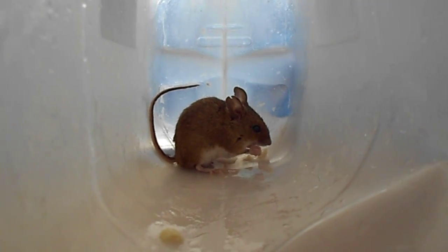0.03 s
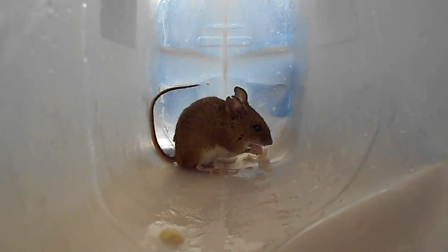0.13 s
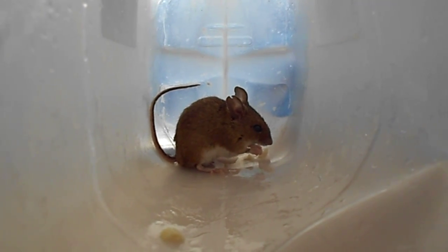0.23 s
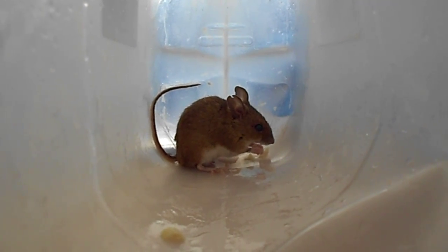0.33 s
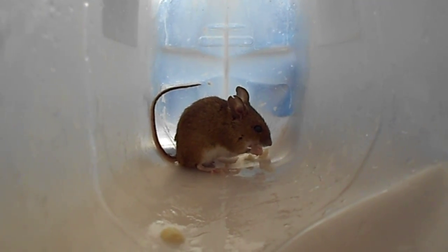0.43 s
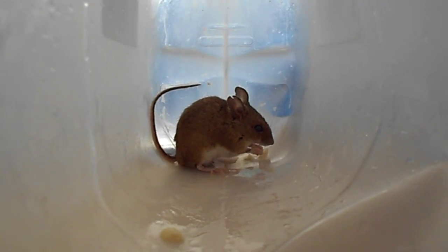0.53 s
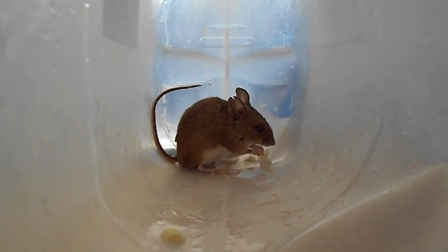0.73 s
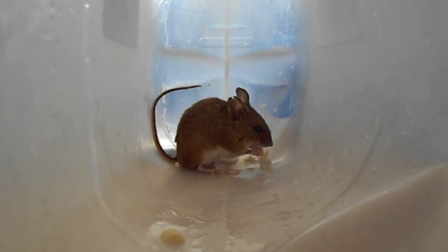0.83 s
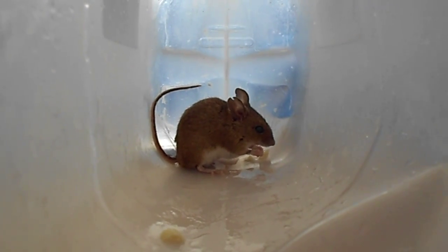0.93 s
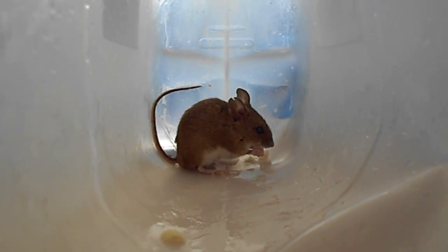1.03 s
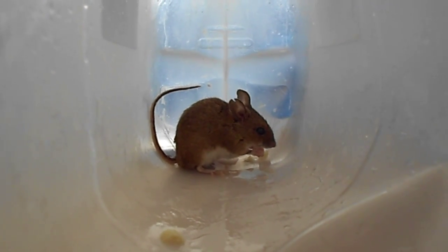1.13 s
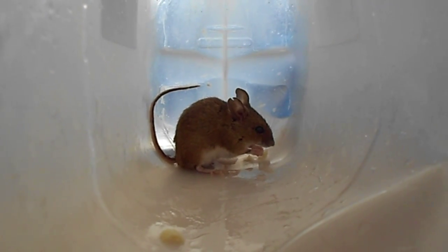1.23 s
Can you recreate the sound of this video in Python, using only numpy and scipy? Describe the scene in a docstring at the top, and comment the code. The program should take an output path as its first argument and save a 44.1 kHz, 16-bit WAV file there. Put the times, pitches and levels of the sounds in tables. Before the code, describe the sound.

One sharp click rings briefly in a thin plastic container where a mouse is feeding. A soft rustle follows, then three short, hissy scuffs. The microphone is close, in a quiet room with faint hiss.

```python
"""Mouse feeding in a plastic container.

Quiet room, close microphone. One sharp snap rings the thin plastic wall and dies away in the container.
Then friction: a broad soft rustle and three short, hissy scuffs.
Under it lie low room noise, faint stirring and the recorder's hiss with a thin whine."""
import sys
import numpy as np
from scipy import signal
from scipy.fft import rfft, irfft
from scipy.io import wavfile

SR = 44100
rng = np.random.default_rng(int(sys.argv[2]) if len(sys.argv) > 2 else 0)


def dump_mix(stems):
    """Bounce the given channels to the path in sys.argv[1] as a 16-bit WAV at rate SR."""
    frames = np.atleast_2d(stems).T  # one column per channel
    limited = np.clip(frames, -1, 1)  # hard clip at full scale
    pcm = np.round(limited * 32767).astype(np.int16)
    wavfile.write(sys.argv[1], SR, pcm)


N = 57330
T = np.arange(N) / SR
HZ = np.fft.rfftfreq(N, 1 / SR)

# Room noise and electronic hiss spectra. Each row: frequency in Hz, relative level in dB.
ROOM_SPECTRUM = [(20, 0), (45, 0), (80, -1), (130, -1.5), (285, -3), (545, -10), (900, -11), (1500, -15)]
HISS_SPECTRUM = [(300, -13), (1200, 0.5), (2500, 1.5), (4000, 0), (7000, -1), (10200, -2.5), (11000, -16.5),
                 (12100, -23), (12600, -48)]
# Whine tones. Each row: frequency in Hz, rms level in dB.
WHINE_TONES = [(5997, -75), (6998, -70.5), (8000, -72.5)]

# Dull movements. Each row: start, rise, hold and fall in seconds, level in dB.
STIR_STROKES = [(-.03, 0.033, 0.18, 0.066, -57), (.95, 0.021, 0.014, 0.034, -63),
                (1.033, .008, 0.015, .10, -52.5), (1.133, 0.038, 0.049, 0.083, -56.5)]
# Stirring spectrum. Each row: frequency in Hz, relative level in dB.
STIR_SPECTRUM = [(40, -23), (130, -5.5), (290, 2.5), (400, -3), (500, -9.5), (1200, -14), (2000, -25),
                 (6000, -52)]

# Plastic wall modes. Each row: frequency in Hz, peak gain in dB, T60 in seconds.
WALL_MODES = [(181, 17, 0.045), (272, 15, 0.062), (421, 17, 0.083), (463, 11, 0.092), (572, 11.5, 0.079),
              (812, 8, 0.069), (930, 4.5, 0.1), (1039, 4, 0.094), (1460, 2, 0.1), (1773, 5, 0.03),
              (2520, 3, 0.04), (3078, 6.5, .018), (4614, 10, 0.0096), (7080, 7, 0.0081)]
# Crack and container reverberation spectra. Each row: frequency in Hz, relative level in dB.
CRACK_SPECTRUM = [(100, -22), (1300, -24), (2000, -6), (2800, -1), (3500, 0), (4000, -16), (5200, -15),
                  (5900, -2), (6400, -11), (7600, 1.5), (8300, 9.5), (9400, 7), (9800, 3), (10600, 4.5),
                  (11100, -9), (11600, -6), (12600, -30)]
REVERB_SPECTRUM = [(100, -21), (400, 4), (900, 1), (1300, -8), (3000, -0.5), (6000, -4), (8800, -0.5),
                   (10500, -3.5), (12000, -27)]
# Reflections off near walls. Each row: delay in seconds, treble gain in dB.
WALL_ECHOES = [(.0047, -17), (.0066, -16.5), (.011, -34)]

# Rustle and scuff spectra. Each row: frequency in Hz, relative level in dB.
RUSTLE_SPECTRUM = [(100, -18), (600, 3), (1300, -0.5), (2200, -5), (4000, -5), (7000, -3.5), (8500, 0.5),
                   (10300, -1), (11200, -19), (12200, -23)]
SCUFF_SPECTRUM = [(1000, -22), (3900, -5), (4750, 1), (5500, -3.5), (6800, -0.5), (8500, -3.5),
                  (10300, -3.5), (11200, -17), (12200, -14)]
# Scuffs. Each row: start, rise, hold and fall in seconds, level in dB, lower and upper edge in Hz.
SCUFF_STROKES = [(0.682, .035, 0.023, 0.093, -49.5, 4620, 9900),
                 (0.835, 0.025, 0.015, 0.091, -51.4, 5000, 9900),
                 (0.965, 0.018, 0.013, .12, -48.5, 4900, 10400)]


def amp(db):
    """Decibels to gain."""
    return 10 ** (np.asarray(db) / 20)


def unit_rms(x):
    """Scale to rms 1."""
    return x / np.sqrt(np.mean(x ** 2) + 1e-20)


def colour(spectrum):
    """Gain per FFT bin, interpolated over log frequency."""
    hz, db = np.transpose(spectrum)
    return amp(np.interp(np.log(HZ + 1), np.log(hz + 1), db))


def noise(gain):
    """Coloured noise, rms 1."""
    return unit_rms(irfft(rfft(rng.standard_normal(N)) * gain, N))


def friction(gain, slips_per_s=5000, slip_share=0.37):
    """Dense tiny slips over smooth rubbing noise, coloured alike, rms 1."""
    slips = unit_rms(rng.standard_normal(N) * (rng.random(N) < slips_per_s / SR))
    rubbing = rng.standard_normal(N)
    contact = np.sqrt(slip_share) * slips + np.sqrt(1 - slip_share) * rubbing
    return unit_rms(irfft(rfft(contact) * gain, N))


def stroke(start_s, rise_s, hold_s, fall_s):
    """Envelope of one movement: linear rise, hold, easing fall."""
    attack = np.clip((T - start_s) / rise_s, 0, 1)
    release = np.clip(1 - (T - start_s - rise_s - hold_s) / fall_s, 0, 1)
    return attack * release ** 1.33


def background(room_db=-54.5, room_top_hz=1400, hiss_db=-57.5):
    """Low room noise, electronic hiss and a thin whine, all steady."""
    room = noise(colour(ROOM_SPECTRUM) / np.sqrt(1 + (HZ / room_top_hz) ** 6))
    whine = sum(amp(db) * np.sqrt(2) * np.sin(2 * np.pi * (hz * T + rng.random()))
                for hz, db in WHINE_TONES)
    hiss = noise(colour(HISS_SPECTRUM))
    return amp(room_db) * room + amp(hiss_db) * hiss + whine


def stirring():
    """Soft movements: dull friction."""
    envelope = sum(amp(db) * stroke(*timing_s) for *timing_s, db in STIR_STROKES)
    return envelope * friction(colour(STIR_SPECTRUM))


def wall_gain(low_cut_hz=126):
    """Plastic wall response: narrow modes over the broad crack spectrum, no deep bass."""
    mode_power = sum(amp(db) ** 2 / (1 + (2 * np.pi * (HZ - hz) * t60_s / np.log(1000)) ** 2)
                     for hz, db, t60_s in WALL_MODES)
    power = mode_power + colour(CRACK_SPECTRUM) ** 2
    return np.sqrt(power / (1 + (low_cut_hz / (HZ + 10)) ** 6))


def crack(start_s, bend_lag_s=0.000943, bend_hz=6000, echo_low_hz=4970):
    """One impulse rings the wall; its bright part echoes off near walls."""
    log_gain = np.log(wall_gain() + 1e-3)
    mirrored = np.r_[log_gain, log_gain[-2:0:-1]]
    ring = np.exp(np.conj(signal.hilbert(mirrored)))[:len(HZ)]  # minimum phase
    arrival_s = start_s + bend_lag_s / (1 + (HZ / bend_hz) ** 8)  # bending waves: lows lag the treble
    travel = np.exp(-2j * np.pi * np.cumsum(arrival_s * np.gradient(HZ)))
    echoes = sum(amp(db) * np.exp(-2j * np.pi * HZ * delay_s) for delay_s, db in WALL_ECHOES)
    highpass = HZ ** 2 / (HZ ** 2 + echo_low_hz ** 2)
    return irfft(ring * travel * (1 + echoes * highpass), N)


def snap(start_s=0.2261, reverb_db=-30.5, reverb_t60_s=0.038):
    """The crack plus short reverberation inside the container."""
    age_s = np.maximum(T - start_s, 0)
    decay = (T >= start_s) * amp(-60 * age_s / reverb_t60_s)
    return crack(start_s) + amp(reverb_db) * decay * noise(colour(REVERB_SPECTRUM))


def rustle(level_db=-51.5):
    """One soft stroke of broadband friction."""
    envelope = stroke(start_s=0.42, rise_s=0.085, hold_s=0.045, fall_s=0.16)
    return amp(level_db) * envelope * friction(colour(RUSTLE_SPECTRUM))


def scuffs():
    """Short friction strokes, each in its own treble band."""
    out = np.zeros(N)
    for *timing_s, db, low_hz, high_hz in SCUFF_STROKES:
        band = 1 / np.sqrt((1 + (low_hz / (HZ + 1)) ** 20) * (1 + (HZ / high_hz) ** 20))
        out += amp(db) * stroke(*timing_s) * friction(colour(SCUFF_SPECTRUM) * band)
    return out


def scene():
    """All sources at one microphone."""
    return (background() + stirring() + snap() + rustle() + scuffs())[None]


def record(dry, cutoff_hz=12500):
    """The recorder's band limit."""
    lowpass = signal.firwin(301, cutoff_hz, window=("kaiser", 9), fs=SR)
    return signal.oaconvolve(dry, lowpass[None], "same")


dry = scene()
out = record(dry)
dump_mix(out)
```